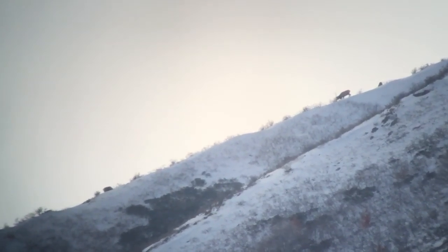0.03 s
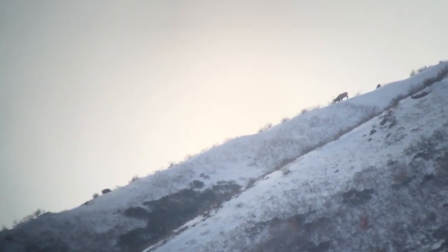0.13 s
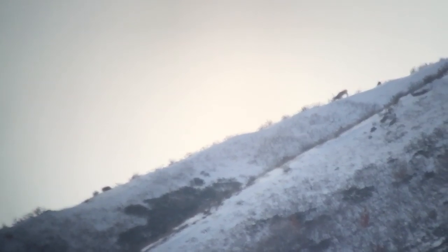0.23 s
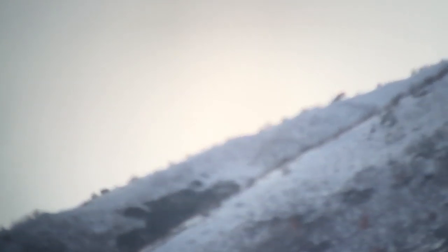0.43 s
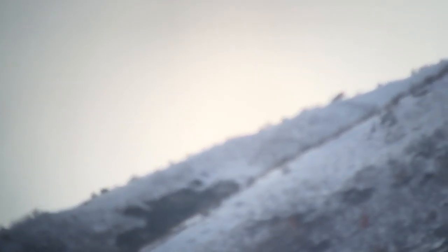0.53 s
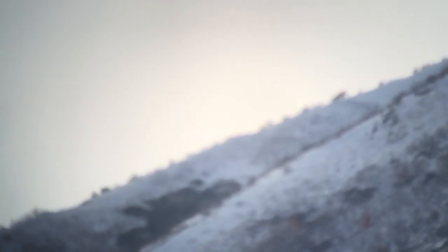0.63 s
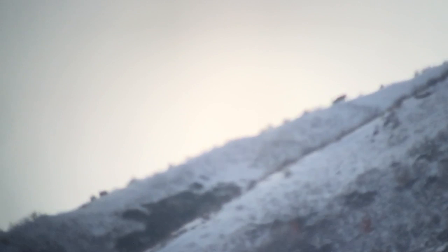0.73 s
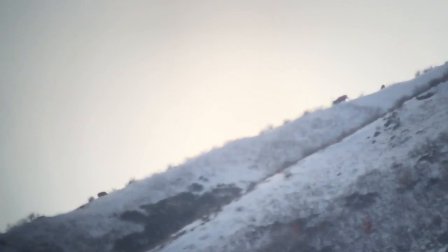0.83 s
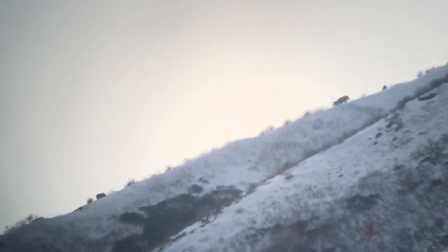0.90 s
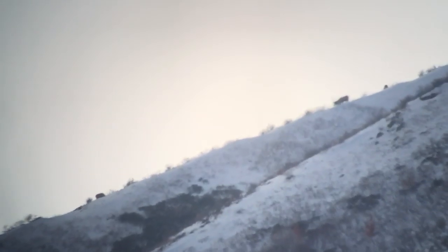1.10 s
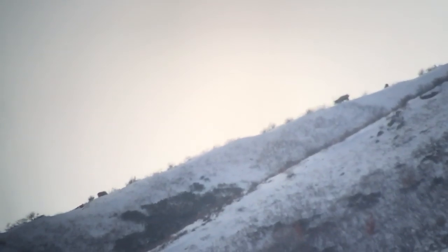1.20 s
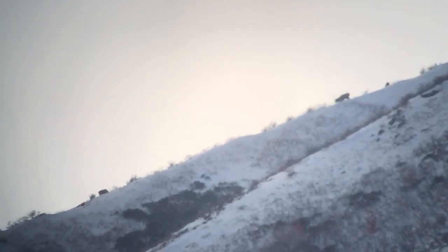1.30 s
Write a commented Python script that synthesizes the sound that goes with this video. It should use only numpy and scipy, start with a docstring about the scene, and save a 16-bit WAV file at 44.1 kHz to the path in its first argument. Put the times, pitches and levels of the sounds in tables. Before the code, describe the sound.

Camera controls click close to the microphone over a faint outdoor rumble, low hum and hiss. From about 0.25 to 0.6 seconds comes a quick, uneven cluster of bright plastic ticks, each with a hollow knock and slight rattle, the four strongest falling by 0.5 seconds. Faint fingertip ticks and one soft click follow between 1.0 and 1.25 seconds, and the quiet background continues to the end.

```python
"""A faint outdoor rumble, a low hum and hiss are heard first, on a still, snowy hillside.
Then the controls of a camera click. Each contact is an impact: a bright plastic tick, followed by
a hollow knock as the case rings in its normal modes, the lows last. Loose parts tremble after it,
and fingertips tick lightly on the case. The resonances of the microphone housing colour everything."""
import sys
import numpy as np
from scipy import signal
from scipy.fft import rfft, irfft
from scipy.io import wavfile

SR = 44100
rng = np.random.default_rng(int(sys.argv[2]) if len(sys.argv) > 2 else 0)


def transcribe(signal):
    """Save signal, clipped to [-1, 1], as a 16-bit WAV file at the path in sys.argv[1]."""
    frames = np.atleast_2d(signal).T
    limited = np.clip(frames, -1, 1)
    pcm = np.round(limited * 32767).astype(np.int16)
    wavfile.write(sys.argv[1], SR, pcm)


N = 59535
TIME = np.arange(N) / SR

# Noise spectra. Each row: frequency in Hz, relative spectral density in dB.
RUMBLE_SPECTRUM = [(20, -15), (42, -8), (65, -7), (115, 0), (200, 0), (270, -10.5), (330, -5.5),
                   (400, -6.5), (500, -2.5), (740, -10.5), (900, -4.5), (1150, -20), (1350, -18),
                   (1700, -29.5), (2500, -28.5), (5000, -31.5), (16000, -68)]
HISS_SPECTRUM = [(100, -39), (2000, -4), (4000, 0), (7000, 2.5), (10000, -7), (13000, -8), (16800, -10.5),
                 (18500, -14)]
TOUCH_SPECTRUM = [(1000, 4.5), (2500, -7), (4100, 6), (6000, -7), (7200, -2), (9000, -18), (19000, -25)]
RATTLE_SPECTRUM = [(30, -50), (90, -22), (140, 0), (200, -2), (250, 3.5), (320, -7), (500, -7), (650, 0),
                   (950, 4), (1500, -16), (2500, -30.5), (6000, -33.5), (16000, -45)]
GRIT_SPECTRUM = [(500, 3.5), (1200, 8.5), (1750, -4), (2200, 8.5), (3000, 1.5), (4000, -8.5), (5000, -14),
                 (6800, 0.5), (8500, -10.5), (12000, -31), (19000, -57)]
SNAP_SPECTRUM = [(2000, -22), (6500, 5.5), (9500, 6), (12000, -6.5), (16000, -3), (19000, -35)]
# Trend of the rumble. Each row: time in seconds, level in dB.
RUMBLE_TREND = [(0, -48.5), (.17, -48.5), (.4, -43), (.7, -50.5), (.9, -47.5), (1.11, -49), (1.35, -51.5)]
# Partials of the hum. Each row: centre frequency in Hz, typical rms level in dB.
HUM_PARTIALS = [(68.3, -51), (102.5, -58.5), (171, -66.5), (237, -65), (312, -63.5)]
# Fingertip touches. Each row: start in seconds, level in dB.
FINGER_TOUCHES = [(0.347, -49), (0.3685, -48), (0.4838, -44.5), (1.0348, -51.5), (1.049, -59), (1.228, -60)]
# Impacts of the controls. Each row: start in seconds; relative levels in dB of the mid knock, low thud,
# upper clack, tick and high snap; pitch ratio of the case; the small part's ring in Hz, its level in dB.
IMPACTS = [ (0.2450, -16, -22, -14.5, -26, -36, 1.029, 1960, -33),
           (0.2821, -23, -30, -28.5, -33, -59, 1.01, 2150, -42),
           (0.3044, -14.5, -18.5, -14, -24, -42, 0.99, 2195, -32.5),
           (0.3172, -31.5, -24.5, -29, -44, -69, 1.01, 2200, -43),
           (0.3752, -12.5, -18, -16, -23.5, -31.5, 1.03, 1480, -36.5),
           (0.4101, -25.5, -26.5, -28, -35.5, -42.5, 0.995, 2164, -37.5),
           (0.435, -40, -46, -35, -49, -67, 1.02, 2200, -48),
           (0.4909, -11.5, -20, -14, -26.5, -27, 1.053, 2605, -32),
           (0.5224, -38, -35, -41, -46, -59, 1.15, 2160, -56),
           (0.5854, -35.5, -42.5, -38.5, -46, -56, 1.09, 2200, -43),
           (1.1028, -44, -37.5, -48, -56, -48.5, 1.13, 3650, -48.5), ]
# Modes of case and catch. Each row: nominal frequency in Hz, relative level in dB, rise time in seconds.
CASE_RESONANCES = [(137, -21.5, 0.0096), (167.9, -20, 0.02), (228, -21.5, 0.0047), (311, -10.5, 0.0085),
                   (426.4, -5, 0.0028), (652, -2, 0.0037), (965, -5, 0.0028), (1243, -9, 0.0013)]
CATCH_RESONANCES = [(3880, -5.5, 0.0011), (4220, -6, 0.0011), (5930, -4, 0.00062), (7110, -6.5, 0.0011),
                    (9420, 0, 0.00036), (10530, -8, 0.00025), (15800, -12, 0.00019)]
# Peaks and hollows of the microphone housing. Each row: frequency in Hz, gain in dB, width in Hz.
HOUSING_BANDS = [(2857, -15, 634), (4166, 5, 320), (4910, -15, 1036), (7127, 6.5, 195), (8000, -15, 1600),
                 (9660, 6, 450), (12400, -5.5, 2460)]

RUMBLE_SWING_DB, HISS_DB = 0.97, -65
HUM_SWING_DB, HUM_WANDER = 4, 0.0137
HUM_DIP_S, HUM_DIP_WIDTH_S, HUM_DIP_DB = .48, .06, -12
RATTLE_DB, RATTLE_RISE_S = -22.5, .011
KNOCK_LAG_S, CASE_SPREAD_DB = 0.00092, .6
THUD_BELOW_HZ, CLACK_ABOVE_HZ, SNAP_ABOVE_HZ = 500, 800, 8000
CATCH_SPREAD_DB, CATCH_DETUNE = 1.5, 0.028
GRIT_DB, TICK_HOLD_S, TICK_DECAY_S = -5.5, 0.00089, 0.0023
SNAP_DB, SNAP_HOLD_S, SNAP_DECAY_S = -3, .0005, .0007
TAIL_DB, TAIL_DECAY_S = -9.5, .005
SWELL_STEEPNESS, PART_RISE_S = 2.66, 0.0016
BASS_CUT_HZ, TREBLE_CUT_HZ = 54.6, 18000


def from_db(db):
    """Amplitude ratio of a level in decibels."""
    return 10 ** (np.asarray(db) / 20)


def unit_rms(x):
    """Normalisation to an rms of 1."""
    return x / np.sqrt(np.mean(x ** 2) + 1e-20)


def noise(spectrum):
    """Spectral shaping of white noise, at unit rms."""
    hz, db = np.transpose(spectrum)
    bin_hz = np.maximum(np.arange(N // 2 + 1) * SR / N, 1)
    gain = from_db(np.interp(np.log(bin_hz), np.log(hz), db))
    return unit_rms(irfft(rfft(rng.standard_normal(N)) * gain, N))


def drift(rate_hz):
    """Slow random fluctuation: low-passed noise at unit rms."""
    pole = np.exp(-2 * np.pi * rate_hz / SR)
    return unit_rms(signal.lfilter([1], [1, -2 * pole, pole * pole], rng.standard_normal(2 * N))[N:])


def swell(start, rise):
    """Gamma envelope: it reaches 1 in the rise time, then dies away."""
    age = np.maximum(TIME - start, 0) / rise
    return (age * np.exp(1 - age)) ** SWELL_STEEPNESS


def burst(start, hold, decay):
    """Transient envelope: sudden onset, short hold, exponential decay with a faint tail."""
    age = np.maximum(TIME - start - hold, 0)
    return (TIME >= start) * (np.exp(-age / decay) + from_db(TAIL_DB) * np.exp(-age / TAIL_DECAY_S))


def ring(start, hz, rise):
    """Damped vibration of one mode, which builds up and dies away."""
    return swell(start, rise) * np.sin(2 * np.pi * hz * (TIME - start))


def hum():
    """Low partials waver by random amplitude and frequency modulation; the level dips briefly once."""
    clock = np.cumsum(1 + HUM_WANDER * drift(7.5)) / SR
    dip_db = HUM_DIP_DB * np.exp(-((TIME - HUM_DIP_S) / HUM_DIP_WIDTH_S) ** 2)
    out = np.zeros(N)
    for hz, db in HUM_PARTIALS:
        amplitude = np.sqrt(2) * from_db(db + dip_db + HUM_SWING_DB * drift(3.8))
        out += amplitude * np.sin(2 * np.pi * (hz * clock + rng.random()))
    return out


def noise_floor():
    """Broadband noise: a fluctuating outdoor rumble and steady microphone hiss."""
    rumble_db = np.interp(TIME, *np.transpose(RUMBLE_TREND)) + RUMBLE_SWING_DB * drift(12)
    return from_db(rumble_db) * noise(RUMBLE_SPECTRUM) + from_db(HISS_DB) * noise(HISS_SPECTRUM)


def fingertips():
    """Light impacts of the fingers give thin ticks and leave the modes of the case at rest."""
    envelope = sum(from_db(db) * burst(s, TICK_HOLD_S, TICK_DECAY_S) for s, db in FINGER_TOUCHES)
    return envelope * noise(TOUCH_SPECTRUM)


def loose_parts():
    """Rattle: loose parts tremble briefly, in proportion to each knock."""
    envelope = sum(from_db(knock_db + RATTLE_DB) * swell(s, RATTLE_RISE_S) for s, knock_db, *_ in IMPACTS)
    return envelope * noise(RATTLE_SPECTRUM)


def case_knocks():
    """Impact excites the normal modes of the case; the low ones tend to peak later and last longer."""
    out = np.zeros(N)
    for start, knock_db, thud_db, clack_db, _, _, pitch, *_ in IMPACTS:
        for k, (hz, db, rise) in enumerate(CASE_RESONANCES):
            struck_db = thud_db if hz < THUD_BELOW_HZ else clack_db if hz > CLACK_ABOVE_HZ else knock_db
            strength = from_db(db + struck_db + CASE_SPREAD_DB * rng.standard_normal())
            polarity = (-1) ** k  # neighbouring modes swing in opposite directions
            out += polarity * strength * ring(start + KNOCK_LAG_S, hz * pitch, rise)
    return out


def catch_ring():
    """Free vibration of the catch in its bright modes, a little different at each impact."""
    out = np.zeros(N)
    for start, _, _, _, tick_db, snap_db, *_ in IMPACTS:
        for hz, db, rise in CATCH_RESONANCES:
            louder, higher = rng.standard_normal(2)
            struck_db = snap_db if hz > SNAP_ABOVE_HZ else tick_db
            strength = from_db(db + struck_db + CATCH_SPREAD_DB * louder)
            out += strength * ring(start, hz * (1 + CATCH_DETUNE * higher), rise)
    return out


def plastic_ticks():
    """Stick and slip: plastic catches and lets go in a burst of noise; the small part that moved rings."""
    grit, snap, parts = 0, 0, 0
    for start, _, _, _, tick_db, snap_db, _, part_hz, part_db in IMPACTS:
        grit += from_db(tick_db + GRIT_DB) * burst(start, TICK_HOLD_S, TICK_DECAY_S)
        snap += from_db(snap_db + SNAP_DB) * burst(start, SNAP_HOLD_S, SNAP_DECAY_S)
        parts += from_db(part_db) * ring(start, part_hz, PART_RISE_S)
    return grit * noise(GRIT_SPECTRUM) + snap * noise(SNAP_SPECTRUM) + parts


def scene():
    """Superposition of the handling sounds and the background, in mono."""
    handling = plastic_ticks() + catch_ring() + fingertips() + case_knocks() + loose_parts()
    return (handling + hum() + noise_floor())[None]


def record(dry):
    """Resonance in the microphone housing colours the sound; the deepest bass and the top are cut."""
    out = signal.sosfilt(signal.butter(2, BASS_CUT_HZ, "high", fs=SR, output="sos"), dry)
    for hz, db, width_hz in HOUSING_BANDS:
        root_gain, half_width = from_db(db / 2), np.pi * width_hz / SR
        tuning = -2 * np.cos(2 * np.pi * hz / SR)
        numerator = [1 + half_width * root_gain, tuning, 1 - half_width * root_gain]
        denominator = [1 + half_width / root_gain, tuning, 1 - half_width / root_gain]
        out = signal.lfilter(numerator, denominator, out)
    return signal.sosfilt(signal.ellip(10, .1, 80, TREBLE_CUT_HZ, fs=SR, output="sos"), out)


dry = scene()
out = record(dry)
transcribe(out)
```